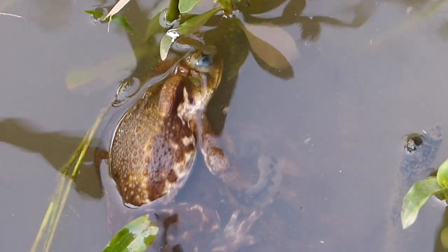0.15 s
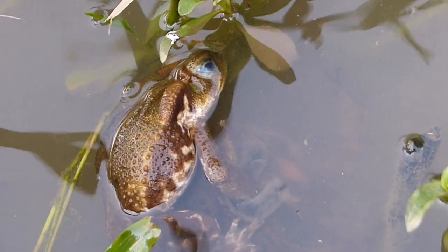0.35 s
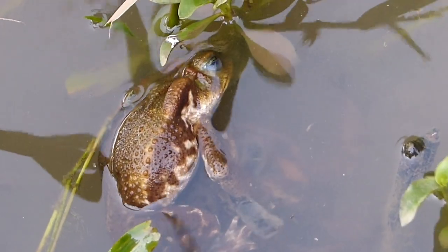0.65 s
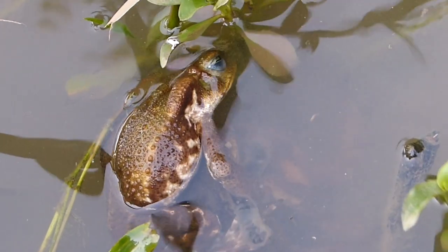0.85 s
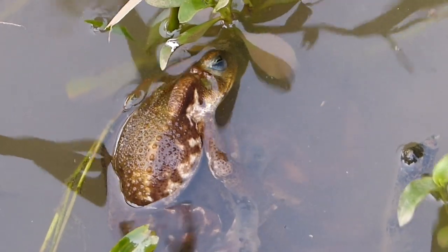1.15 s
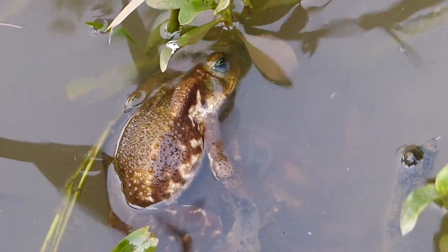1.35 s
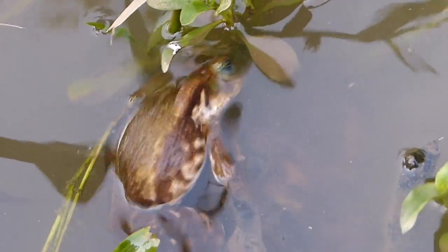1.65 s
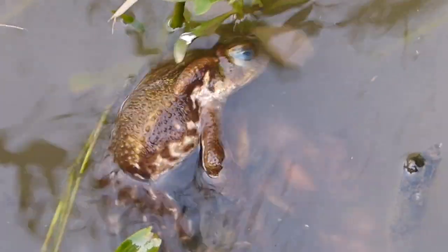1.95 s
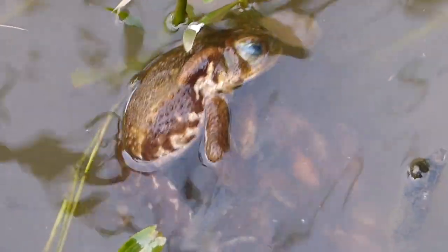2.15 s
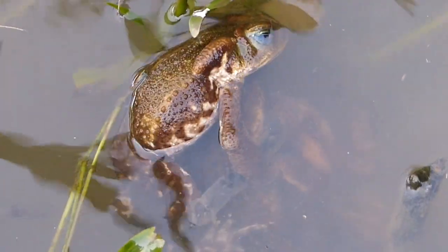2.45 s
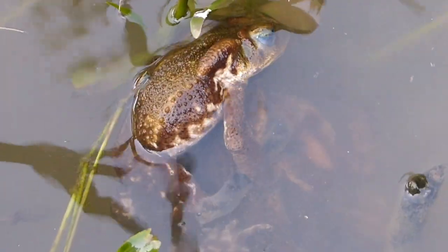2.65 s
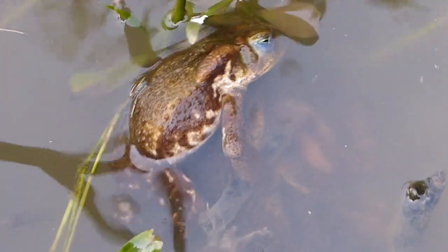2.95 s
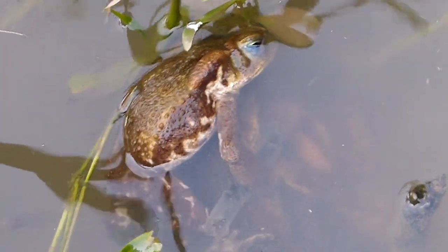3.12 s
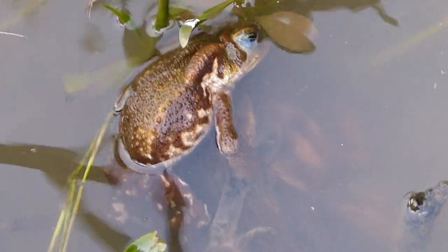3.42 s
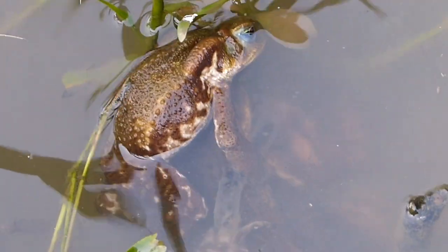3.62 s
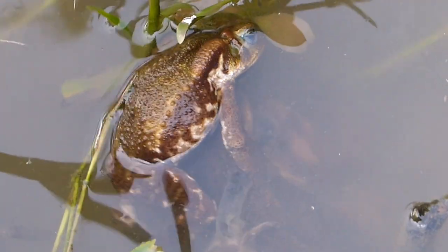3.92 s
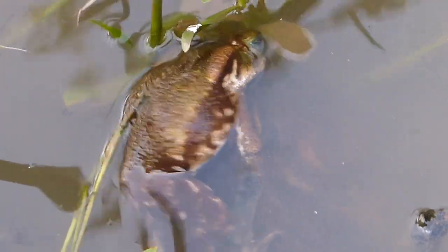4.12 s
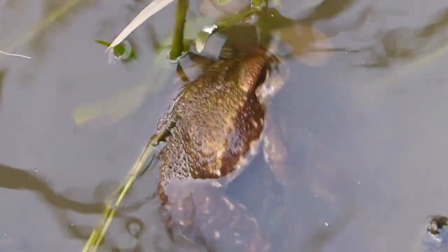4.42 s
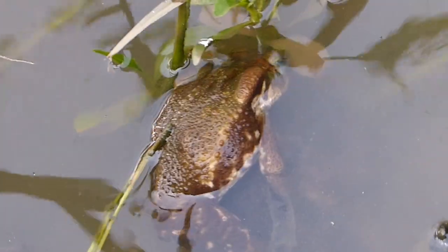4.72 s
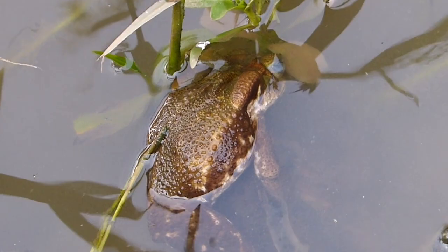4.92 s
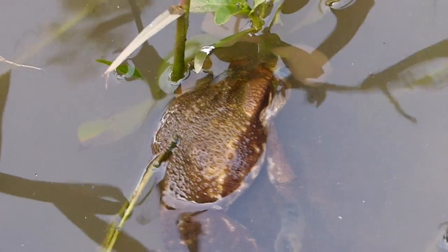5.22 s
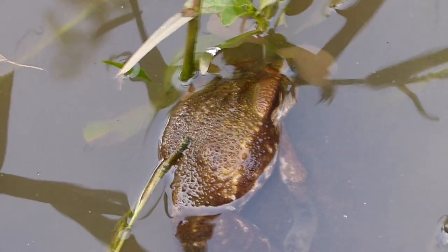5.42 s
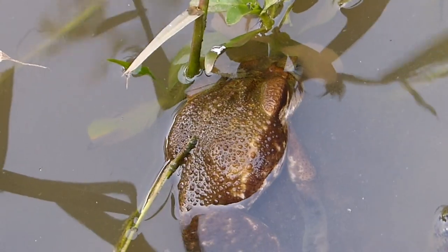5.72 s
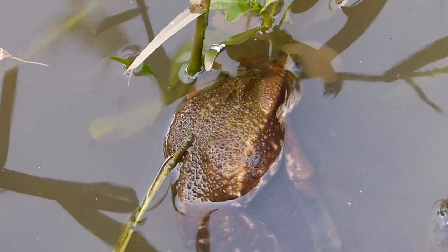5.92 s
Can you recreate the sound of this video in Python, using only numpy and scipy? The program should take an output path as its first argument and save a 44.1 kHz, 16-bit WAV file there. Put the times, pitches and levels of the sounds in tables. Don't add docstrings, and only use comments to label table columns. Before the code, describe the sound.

At an open marsh pool, a nearby toad on the left trills low and steadily throughout, about a dozen pulsing beats a second. A softer toad on the right overlaps it, and a higher one trills at the start and again in the second half. Cricket chirps and high rattling insects shimmer above. Reeds tick, a bird sings lightly, and round frog whistles enter midway. Close outdoor stereo microphone.

```python
import sys
import numpy as np
from scipy import signal
from scipy.fft import rfft, irfft, next_fast_len
from scipy.io import wavfile
from scipy.ndimage import uniform_filter1d, map_coordinates

SR = 44100
rng = np.random.default_rng(int(sys.argv[2]) if len(sys.argv) > 2 else 0)


def invert_db(x):
    u = np.asarray(x, float) / 20
    return 10 ** u


def digitize_waveform(pressure):
    field = np.atleast_2d(pressure).T
    bounded = np.clip(field, -1, 1)
    quanta = np.round(bounded * 32767).astype(np.int16)
    wavfile.write(sys.argv[1], SR, quanta)


N = 267731


def unit(x):
    return x / np.sqrt(np.mean(x ** 2) + 1e-20)


def along(points, hz):
    f, v = np.transpose(points)
    return np.interp(np.log(hz + 1), np.log(f + 1), v)


def curves(rows, outside=None):
    s, *cols = np.transpose(rows)
    return [np.interp(np.arange(N) / SR, s, c, outside, outside) for c in cols]


def wobble(rate_hz, size=N):
    knots = rng.standard_normal(int(size * rate_hz / SR) + 4)
    return map_coordinates(knots, [np.arange(size) * rate_hz / SR])


def filtered(x, response):
    m = next_fast_len(N + SR // 2)
    return irfft(rfft(x, m) * response(np.fft.rfftfreq(m, 1 / SR)), m)[..., :N]


# frequency in Hz, left-right likeness (0-1).
PORT_LIKENESS = [(30, 0.69), (100, 1), (300, 0.46), (1500, 0.4), (3000, 0.64), (6000, 0.44), (9000, 0.27),
                 (13000, 0.16)]


def rush(spectrum, patchy_db):
    z = signal.stft(rng.standard_normal((2, N)), nperseg=512)[2]
    field = uniform_filter1d(uniform_filter1d(rng.standard_normal(z.shape[1:]), 6, 0), 10, 1)
    pair = signal.istft(z * invert_db(patchy_db * unit(field)), nperseg=512)[1][:, :N]

    def mid_side(hz):
        turn = np.arccos(np.clip(along(PORT_LIKENESS, hz), -1, 1)) / 2
        return invert_db(along(spectrum, hz)) * [np.cos(turn), np.sin(turn)]

    mid, side = filtered(pair, mid_side)
    return unit(np.array([mid + side, mid - side]))


def add(track, s, sound):
    part = track[..., max(round(s * SR), 0):][..., :sound.shape[-1]]
    part += sound[..., :part.shape[-1]]


def balance(pan_db):
    return invert_db([[pan_db / 2], [-pan_db / 2]])


# frequency in Hz, t60 in s.
TREE_T60_S = [(300, 0.69), (1000, 0.64), (4000, 0.51), (12000, 0.099)]


def placed(x, pan_db, lag_s, wet_db):
    hz, t, z = signal.stft(rng.standard_normal((2, SR // 2)), SR, nperseg=256)
    decay = invert_db(-60 * t / along(TREE_T60_S, hz)[:, None])
    tail = signal.istft(z * decay, SR, nperseg=256)[1]
    tail /= np.linalg.norm(tail[0])
    wet = signal.fftconvolve(np.pad(x, (300, 0))[None], tail, axes=1)[:, :N]
    late = filtered(x, lambda f: np.exp(-2j * np.pi * f * lag_s))
    return balance(pan_db) * [x, late] + invert_db(wet_db) * wet


# frequency in Hz, dB per Hz.
MARSH_SPECTRUM = [(15, -38), (30, -27.5), (50, -43), (65, -34), (120, -27), (180, -21), (340, -28),
                  (430, -23.5), (650, -4), (900, -19.5), (1400, -26), (2000, -38), (2600, -39), (4000, -48)]
# time in s, level in dB.
MARSH_LEVEL_DB = [(0.0, -45), (2.47, -47.5), (5.99, -44), (6.07, -40.5)]


def marsh_floor():
    gain = invert_db(curves(MARSH_LEVEL_DB)[0] + 13 + 2.17 * wobble(8.7))
    return gain * rush(MARSH_SPECTRUM, patchy_db=2.0)


# time in s, strokes gained on a steady beat.
LOW_WING_STROKES = [(0, .45), (1, .75), (1.5, .85), (2.6, .88), (3, .55), (3.5, .67), (5, .93), (6.1, 1.16)]
# time in s, level in dB.
LOW_WING_DB = [(0, -47), (1.5, -45.5), (3, -47), (4.5, -45.5), (6.07, -48.5)]
# frequency in Hz, dB per Hz.
LOW_WING_SPECTRUM = [(9000, -25), (10000, -3.5), (11000, 2), (11700, -4.5), (12800, -2.5), (14000, -13),
                     (15500, -16)]


def low_bush_cricket():
    turn = 22.9 * np.arange(N) / SR + curves(LOW_WING_STROKES)[0]
    swell_db = 5.1 * np.cos(2 * np.pi * turn) + 0.081 * np.cos(np.pi * turn) + 0.71 * wobble(66)
    teeth = rush(LOW_WING_SPECTRUM, patchy_db=1.5)[0]
    low = invert_db(curves(LOW_WING_DB)[0]) * unit(invert_db(swell_db)) * teeth
    return placed(low, pan_db=-3.0, lag_s=-0.000027, wet_db=-3.5)


# time in s, level in dB.
BREEZE_LEVEL_DB = [(0, -63), (1.9, -56.5), (3.7, -58), (4.3, -54), (4.6, -62), (5.05, -52.5), (6.07, -57)]
# peak in s, peak in dB, rise in s, fall in s (both over 10 dB).
REED_BRUSHES = [
    (.68, -59.5, 0.24, 2),
    (2.841, -44, 0.014, 0.09),
    (3.89, -46.5, 0.05, 0.02),
    (4.58, -45, 0.089, 0.3),
    (4.72, -42.5, 0.049, 0.1),
    (4.899, -44.5, 0.045, 0.16),
    (5.73, -52, 0.13, 0.7),
]


def rustle_gain():
    t = np.arange(N) / SR
    power = invert_db(curves(BREEZE_LEVEL_DB)[0]) ** 2
    for s, db, rise_s, fall_s in REED_BRUSHES:
        power += invert_db(db - 10 * np.maximum((s - t) / rise_s, (t - s) / fall_s)) ** 2
    return np.sqrt(power)


# frequency in Hz, dB per Hz.
REED_SPECTRUM = [(900, -87), (1500, 2), (2500, 0.5), (5000, 2.5), (8000, -1), (11000, -2), (15500, -5.5)]
# time in s, peak in dB, low part in dB, left-right in dB.
STEM_SNAPS = [
    (1.9274, -16, -47, 23),
              (2.111, -27, -21, 21),
    (2.481, -29, -11.5, 12),
    (2.827, -36, 7, 17),
    (2.842, -32.5, 2, 8),
    (3.9149, -38, -19, 0.5),
    (4.0992, -29, -4, -0.5),
    (4.563, -27, -2, -13),
    (4.708, -29, 2, -9),
    (4.712, -31, 7, -10),
    (5.7415, -27, -7, -8),
]
STEM_TAPS = [.7, .7, 0, -.7, -.7]


def reeds():
    grit = invert_db(1.7 * np.array([wobble(400), wobble(400)]))
    out = invert_db(10.5) * rustle_gain() * unit(grit * rush(REED_SPECTRUM, patchy_db=1.3))
    t = np.arange(200) / SR
    for s, db, low_db, pan_db in STEM_SNAPS:
        crack = rng.standard_normal(len(t))
        crack /= np.sqrt(np.mean(crack[:8] ** 2))
        knock = invert_db(low_db + 15.5) * np.sin(2 * np.pi * 2200 * t)
        snap = np.convolve(crack, STEM_TAPS, "same") + knock
        add(out, s, invert_db(db - 60 * t / 0.00086) * snap * balance(pan_db))
    return out


def beats(pace, effort, scatter_db):
    bouts = []
    for bout in pace:
        s, count = np.transpose(bout)
        bouts.append(np.interp(np.arange(bout[-1][1] + 1), count, s))
    s = np.concatenate(bouts)
    late, size = rng.standard_normal((len(s), 2)).T
    db = np.interp(s, *np.transpose(effort)) + scatter_db * size
    return np.transpose([s + .0004 * late, db])


# time in s, chirps counted.
CRICKET_BOUTS = [
    [(.018, 0), (.232, 4), (.546, 10), (.771, 14)],
    [(1.812, 0), (1.922, 2), (2.45, 12), (2.76, 18), (3.033, 23), (3.148, 25), (3.28, 27)],
    [(4.798, 0), (4.896, 2), (4.953, 3), (5.593, 15), (5.761, 18), (6.006, 22)],
]
# time in s, level in dB.
CRICKET_EFFORT_DB = [(0, -40), (.8, -38.5), (1.8, -46), (2.45, -39.5), (3.298, -39), (4.8, -45),
                     (5.05, -40.5), (6, -38.5)]


def cricket():
    out, t = np.zeros(N), np.arange(round(.03 * SR)) / SR

    def scrape(at_s, length_s):
        arc = np.sin(np.pi * np.clip((t - at_s) / length_s, 0, 1))
        return np.clip(arc, 0, 1) ** 0.74

    shape = .45 * scrape(0, .005) + .75 * scrape(.006, .006) + scrape(.0125, .0155)
    for s, db in beats(CRICKET_BOUTS, CRICKET_EFFORT_DB, scatter_db=0.5):
        hz = 3370 + 30 * rng.standard_normal() - 8500 * t
        tone = np.sin(2 * np.pi * np.cumsum(hz) / SR)
        add(out, s - .019, invert_db(db + 2.0) * shape * tone)
    return placed(out, pan_db=-5.0, lag_s=0, wet_db=-15.0)


# time in s, added share of delay.
PUFF_STRETCH = [(.6, .05), (1.8, .026), (3, .01), (4.2, 0), (5.4, -.004)]


def toad(beat_rows, puffs, gain_db, shape, warming, drift, jitter_s, scatter_db):
    out, t = np.zeros(N), np.arange(SR // 30) / SR
    sharp, glide_hz_per_s = shape
    for s, db in beat_rows:
        late_s = 0
        stretch = 1 + warming * np.interp(s, *np.transpose(PUFF_STRETCH))
        for delay_s, puff_db, hz, rise_s in puffs:
            late_draw, level_draw = rng.standard_normal(2)
            swell = (t / rise_s * np.exp(1 - t / rise_s)) ** sharp
            sac_hz = hz * (1 + drift * (s - 3)) + glide_hz_per_s * t / 2
            ring = np.sin(2 * np.pi * sac_hz * t)
            level = invert_db(db + gain_db + puff_db + scatter_db * level_draw)
            add(out, s + delay_s * stretch + late_s, level * swell * ring)
            late_s += jitter_s * late_draw
    return out


# delay in s, level in dB, sac pitch in Hz, rise in s.
NEAR_TOAD_PUFFS = [
    (0, .3, 658, .0038),
    (.00831, 0, 643, .0043),
    (.01691, -2.8, 607, .0061),
    (.0253, -10.5, 599, .0043),
]
RIGHT_TOAD_PUFFS = [
    (0, -.5, 704, .0058),
    (.00937, 0, 698, .0055),
    (.01852, -2.2, 661, .0066),
    (.0251, -14, 612, .0036),
]
FAR_TOAD_PUFFS = [
    (0, 1, 970, .0027),
    (.0083, -.5, 915, .0036),
    (.0167, -3.5, 880, .0044),
    (.0256, -9, 860, .0045),
]
# time in s, beats counted.
NEAR_TOAD_BOUTS = [
    [(.0218, 0), (.5618, 7), (.7898, 10), (1.0218, 13), (1.3322, 17), (1.7214, 22), (1.9613, 25),
     (2.597, 33), (2.989, 38), (3.15, 40), (3.388, 43), (3.63, 46), (4.0397, 51), (4.2832, 54), (4.612, 58),
     (4.9405, 62), (6.011, 75)],
]
RIGHT_TOAD_BOUTS = [
    [(.0378, 0), (.3234, 4), (.6825, 9), (.903, 12), (1.1217, 15), (1.479, 20), (1.84, 25), (2.048, 28),
     (2.184, 30), (2.3305, 32), (2.559, 35), (2.9468, 40), (3.3349, 45), (3.5798, 48), (3.9825, 53),
     (4.3149, 57), (4.727, 62), (5.1586, 67), (5.662, 73), (5.995, 77)],
]
FAR_TOAD_BOUTS = [
    [(.0437, 0), (.2206, 2), (.4952, 5), (.7617, 8), (1.132, 12), (1.2277, 13)],
    [(3.335, 0), (3.815, 6), (4.1524, 10), (4.403, 13), (4.6597, 16), (5.0014, 20), (5.2604, 23),
     (5.516, 26), (5.603, 27), (6.039, 32)],
]
# time in s, level in dB.
NEAR_TOAD_DB = [(0, -17), (.7, -15), (.93, -16.5), (1.4, -14.5), (2.149, -14.5), (2.3, -15), (2.9, -14.5),
                (3.6, -13.5), (5.2, -14), (6.07, -14)]
RIGHT_TOAD_DB = [(0, -25.5), (1.05, -23), (1.3, -26.5), (1.7, -23.5), (2.6, -20.5), (3.6, -20.5),
                 (4.6, -18), (5.198, -24), (6.07, -22.5)]
FAR_TOAD_DB = [(0, -19.5), (1.101, -21), (1.25, -24.5), (3.331, -36), (3.5, -28.5), (4.1, -22),
               (4.702, -17.5), (6.07, -20.5)]
# swell sharpness, pitch glide in a puff in Hz per s.
PUFF_SHAPE = dict(near=(2.5, 2000), right=(3, 5000), far=(2.6, -2300))
PUFF_JITTER_S = dict(near=.00006, right=.0001, far=.00012)
TOAD_ECHO_DB = dict(near=-25, right=-18, far=-16)


def toads():
    near = toad(beats(NEAR_TOAD_BOUTS, NEAR_TOAD_DB, scatter_db=.4), NEAR_TOAD_PUFFS, 2.5, PUFF_SHAPE["near"],
                warming=1, drift=.003, jitter_s=PUFF_JITTER_S["near"], scatter_db=.5)
    right = toad(beats(RIGHT_TOAD_BOUTS, RIGHT_TOAD_DB, scatter_db=.8), RIGHT_TOAD_PUFFS, 0, PUFF_SHAPE["right"],
                 warming=0, drift=.006, jitter_s=PUFF_JITTER_S["right"], scatter_db=.8)
    far = toad(beats(FAR_TOAD_BOUTS, FAR_TOAD_DB, scatter_db=.7), FAR_TOAD_PUFFS, -2, PUFF_SHAPE["far"],
               warming=0, drift=.004, jitter_s=PUFF_JITTER_S["far"], scatter_db=.9)
    return (placed(near, pan_db=9.0, lag_s=.00001, wet_db=TOAD_ECHO_DB["near"])
            + placed(right, pan_db=-10.0, lag_s=.0001, wet_db=TOAD_ECHO_DB["right"])
            + placed(far, pan_db=10.0, lag_s=-0.00027, wet_db=TOAD_ECHO_DB["far"]))


def sung(shape, notes):
    return [[(s + length_s * share, top_hz - sweep_hz * under, db + down_db) for share, under, down_db in shape]
            for s, length_s, top_hz, sweep_hz, db in notes]


# partial number, dB at full voice.
BEAK_DB = [(1, -3.5), (2, 5), (3, -4), (4, -13), (5, -9)]


def bird_notes(notes, buzz, flutter, leaves_db, low_db, dull_db):
    out = np.zeros(N)
    rough = 1 + 200 * buzz
    for rows in notes:
        s, hz, db = np.transpose(rows)
        t = np.arange(s[0], s[-1], 1 / SR)
        level_db = np.interp(t, s, db)
        glide = uniform_filter1d(np.interp(t, s, hz), len(t) // 13, mode="nearest")
        phase = 2 * np.pi * np.cumsum(glide / 2 * (1 + buzz * wobble(937, len(t)))) / SR
        loss_db = rough * np.minimum(level_db + 41, 0) - dull_db * (1 - glide / glide.max())
        stack = np.zeros(len(t))
        for k, beak_db in BEAK_DB:
            partial_db = beak_db + loss_db * (k >= 3) + low_db * (k == 1)
            partial_db = partial_db - 220 * buzz * (k != 2) - 700 * buzz * (k >= 5)
            stack += invert_db(partial_db) * np.sin(k * phase)
        flutter_hz = 479 * (1 + 0.258 * wobble(121.4, len(t)))
        beating = 1 + flutter * np.sin(2 * np.pi * np.cumsum(flutter_hz) / SR)
        fade = signal.windows.tukey(len(t), .1) * beating
        add(out, s[0], invert_db(level_db + 1.0 + leaves_db * wobble(88.6, len(t))) * fade * stack)
    return out


# share of length, pitch under the top (0-1 of the sweep), level under the peak in dB.
RISE_SHAPE = [(0, 1, -24), (.12, .55, -17), (.27, .14, -8.5), (.55, 0.02, -6), (.72, .02, -6),
              (.85, .06, -11), (1, 0.2, -25)]
CLIPPED_SHAPE = [(0, .7, -18), (.2, .3, -9), (.6, .02, -4), (.85, 0.043, 1), (.92, 0.35, -3.5),
                 (1, 0.94, -6)]
FALL_SHAPE = [(0, .45, -14), (.08, .24, -1), (.18, 0, -9), (.29, 0, -9), (.36, .17, 4), (.47, .4, -12),
              (.64, .65, -11), (.8, .77, -5), (1, 1, -14)]
OPEN_FALL_SHAPE = [(0, 0.666, -17), (.06, 0.68, -20), (.14, .04, -4), (.21, 0, -2), (.32, .1, 1),
                   (.5, .34, -1.5), (.75, .58, -11), (.85, .75, -24), (1, 1, -13)]
ARCH_SHAPE = [(0, 0.947, -8), (.045, .72, -3.5), (.07, 0.536, -13), (.115, 0.316, 0), (.19, 0.123, -5.5),
              (.36, 0.018, 0.5), (.52, .01, 3), (.78, 0.126, -5.5), (1, 0.375, -7)]
VEILED_ARCH_SHAPE = [(0, .95, -14), (.04, .62, -8), (.17, .36, -19), (.24, .1, -9), (.36, .01, 0),
                     (.66, .03, -1), (.7, .05, -19), (.85, .18, -14), (1, .7, -16)]
# start in s, length in s, top in Hz, sweep in Hz, peak in dB.
RISING_NOTES = [
    (3.79, .15, 4010, 1272, -27.5),
]
CLIPPED_NOTES = [
    (1.004, 0.094, 3930, 597, -41),
    (1.37, .05, 3760, 60, -47),
    (1.44, 0.059, 3670, 60, -51),
    (1.979, 0.093, 3990, 590, -44.5),
    (3.924, 0.032, 4910, 200, -40.5),
    (5.193, 0.097, 3840, 310, -39),
]
FALLING_NOTES = [
    (1.329, 0.13, 3700, 1327, -40),
    (5.517, .118, 3850, 1420, -39.5),
]
OPEN_FALLING_NOTES = [
    (4.082, .13, 3506, 1510, -30.5),
]
ARCHED_NOTES = [
    (2.442, 0.37, 3466, 899, -56),
    (4.267, 0.305, 3165, 750, -35),
    (5.739, 0.28, 3301, 351.6, -46),
]
VEILED_NOTES = [
    (1.54, 0.26, 3110, 700, -44),
]


def bird():
    rising = bird_notes(sung(RISE_SHAPE, RISING_NOTES),
                        buzz=.03, flutter=.5, leaves_db=4, low_db=0, dull_db=30 * 1 / 7)
    clipped = bird_notes(sung(CLIPPED_SHAPE, CLIPPED_NOTES),
                         buzz=.02, flutter=.2, leaves_db=2.5, low_db=0, dull_db=30 * 1 / 5)
    falling = bird_notes(sung(FALL_SHAPE, FALLING_NOTES),
                         buzz=.022, flutter=.2, leaves_db=4, low_db=3, dull_db=160 * 1 / 5.4)
    open_falling = bird_notes(sung(OPEN_FALL_SHAPE, OPEN_FALLING_NOTES),
                              buzz=.014, flutter=.2, leaves_db=2.5, low_db=-4, dull_db=130 * 1 / 3.8)
    arched = bird_notes(sung(ARCH_SHAPE, ARCHED_NOTES),
                        buzz=.003, flutter=0, leaves_db=1.8, low_db=0, dull_db=0)
    veiled = bird_notes(sung(VEILED_ARCH_SHAPE, VEILED_NOTES),
                        buzz=.004, flutter=0, leaves_db=1, low_db=4, dull_db=60 * 1 / 1.8)
    song = rising + clipped + falling + open_falling + arched + veiled
    return placed(song, pan_db=-4.0, lag_s=0, wet_db=-7.5)


# time in s, strokes gained on a steady beat.
HIGH_WING_STROKES = [(1, .2), (1.5, .32), (2, .39), (2.5, .4), (3, .38), (4, .26), (5, .16), (6.1, .04)]
# time in s, level in dB.
HIGH_WING_DB = [(1.2, -53), (1.4, -47), (1.5, -42.5), (6.07, -41)]
# frequency in Hz, dB per Hz.
HIGH_WING_SPECTRUM = [(5290, -61), (9000, -13), (10800, -2.5), (12000, -1.5), (13300, 1.5), (14200, 3.5),
                      (15000, -5), (15600, -2)]


def high_bush_cricket():
    turn = (11.45 * np.arange(N) / SR + curves(HIGH_WING_STROKES)[0] + .3) % 1
    stroke_db = np.interp(turn, [0, .14, .18, .49, .51, .525, .64, .74, .95, .975, .99],
                          [-20, -2.5, -0.5, -0.5, -9.0, -7, -19, -5.0, 1.0, -5.0, -5])
    slowing = np.interp(turn, [.3, .36, .51, .52], [.15, .6, .6, .15])
    teeth = 1 + slowing * np.sin(2 * np.pi * np.cumsum(400 + 30 * wobble(9.9)) / SR)
    rattle = unit(invert_db(stroke_db) * teeth) * rush(HIGH_WING_SPECTRUM, patchy_db=-1)[0]
    high = invert_db(curves(HIGH_WING_DB, outside=-90)[0] + 1.0) * rattle
    return placed(high, pan_db=-9.0, lag_s=-0.000012, wet_db=-4)


# time in s, peak in dB, pitch in Hz.
FROG_PIPES = [(2.608, -40, 1180), (2.84, -38, 1146), (2.9567, -42, 1217), (3.236, -43, 1133),
              (3.423, -29, 1210), (3.6524, -27, 1190), (3.882, -26.5, 1178), (4.116, -26, 1190),
              (4.347, -27, 1177), (4.438, -37, 1190), (4.6084, -26, 1176), (4.758, -28, 1244),
              (4.858, -35, 1236), (5.007, -32, 1294), (5.315, -35, 1162), (5.494, -33, 1272),
              (5.56, -32, 1265), (5.755, -41, 2330), (5.969, -34.5, 1235)]


def frog():
    out, t = np.zeros(N), np.arange(round(.052 * SR)) / SR
    swell = np.sin(np.pi * t / t[-1]) ** 0.68
    for s, db, hz in FROG_PIPES:
        tone = np.sin(2 * np.pi * np.cumsum(hz * (1.02 - 0.86 * t)) / SR)
        add(out, s + 0.00106, invert_db(db + 2.5 * wobble(200, len(t))) * swell * tone)
    return placed(out, pan_db=-3.0, lag_s=0, wet_db=-19.0)


# start in s, end in s, second order in dB, third order in dB.
ENGINE_LOADS = [
    (3.015, 3.243, -52.5, -56.5),
    (3.274, 3.375, -56.5, -62),
    (3.437, 5.147, -47.5, -54),
    (5.19, 5.453, -45.5, -49.5),
    (5.193, 5.34, -46, -43.5),
    (5.625, 6.199, -42, -43.5),
]


def load_db(column):
    t = np.arange(N) / SR
    rise_db_per_s, fall_db_per_s = 900, 350
    levels = []
    for row in ENGINE_LOADS:
        outside_db = np.maximum(rise_db_per_s * (row[0] - t), fall_db_per_s * (t - row[1]))
        levels.append(row[column] - np.maximum(outside_db, 0))
    return np.max(levels, axis=0)


# time in s, turns per s.
SHAFT_TURNS_HZ = [(0, 41.6), (6, 41.6), (6.025, 35.5), (6.07, 35.5)]
# order, level in dB.
UPPER_ORDERS_DB = [(4, -56), (6, -59.5), (7, -60.5)]


def engine():
    second_db, third_db = load_db(column=2), load_db(column=3)
    phase = 2 * np.pi * np.cumsum(curves(SHAFT_TURNS_HZ)[0] + 0.179 * wobble(3)) / SR
    second = invert_db(second_db + 8.0) * np.sin(2 * phase)
    third = invert_db(third_db + 6.5) * np.sin(3 * phase)
    upper = sum(invert_db(db + 3.5 * wobble(3.4)) * np.sin(k * phase) for k, db in UPPER_ORDERS_DB)
    return second + third + upper * invert_db(1.03 * (third_db + 55.0))


def scene():
    ground = marsh_floor() + reeds() + engine()
    insects = low_bush_cricket() + cricket() + high_bush_cricket()
    return ground + insects + toads() + bird() + frog()


def top_cut(x):
    return signal.sosfilt(signal.butter(12, 15790, fs=SR, output="sos"), x)


def record(dry):
    mix = filtered(dry, lambda hz: hz < 15800) - .0068
    return top_cut(mix)


dry = scene()
out = record(dry)
digitize_waveform(out)
```